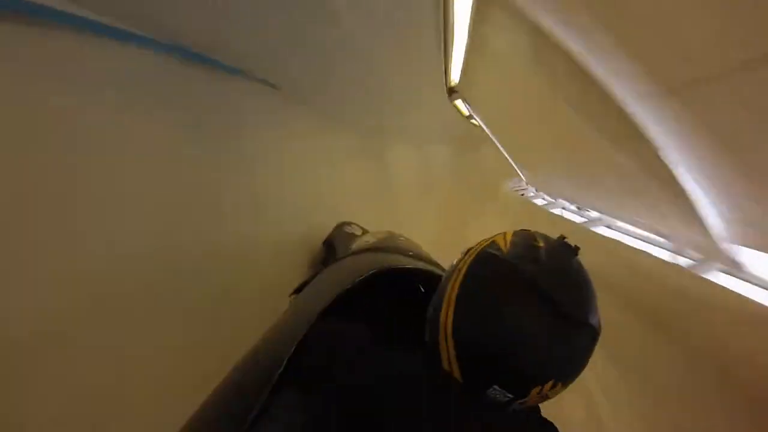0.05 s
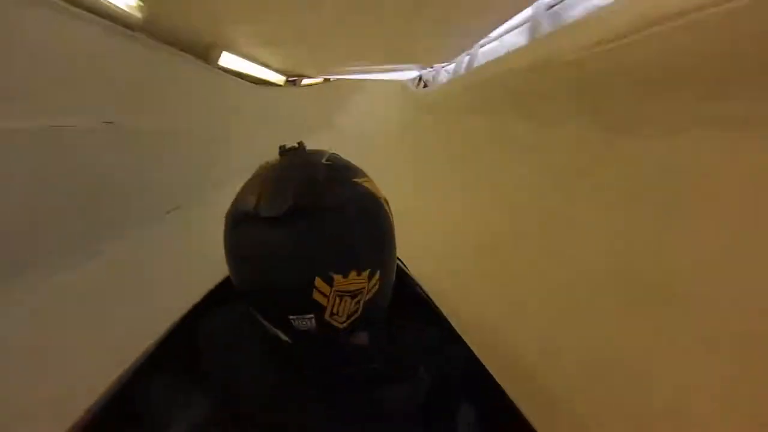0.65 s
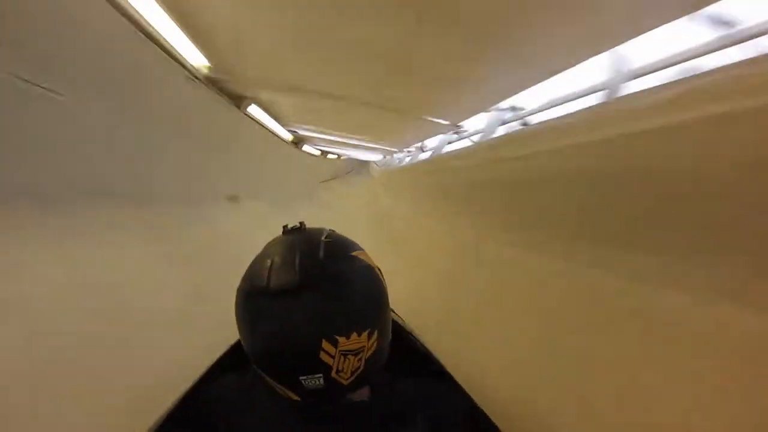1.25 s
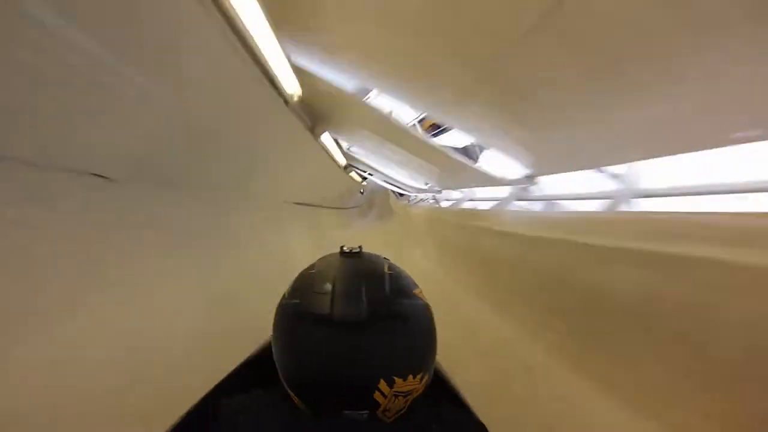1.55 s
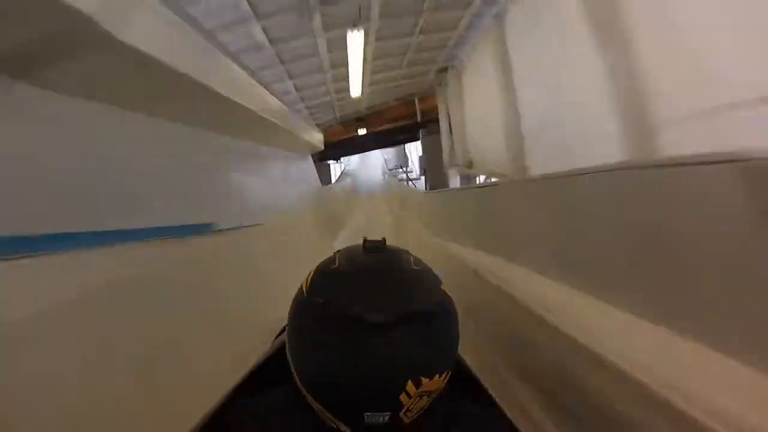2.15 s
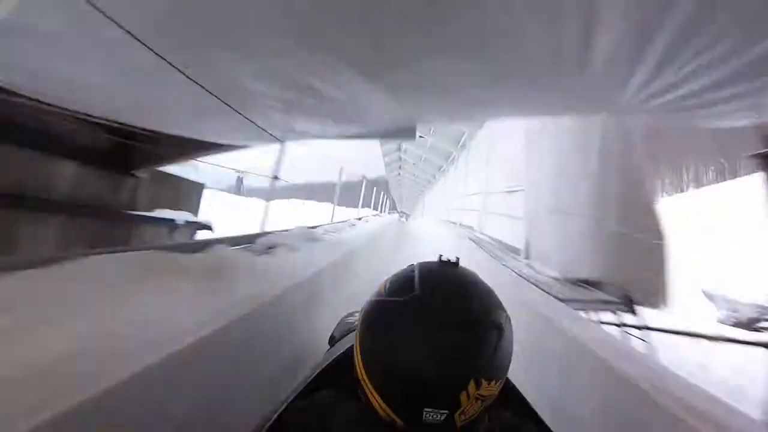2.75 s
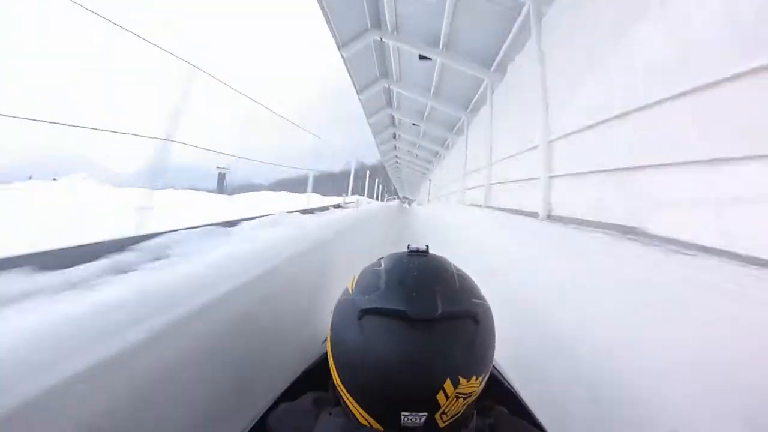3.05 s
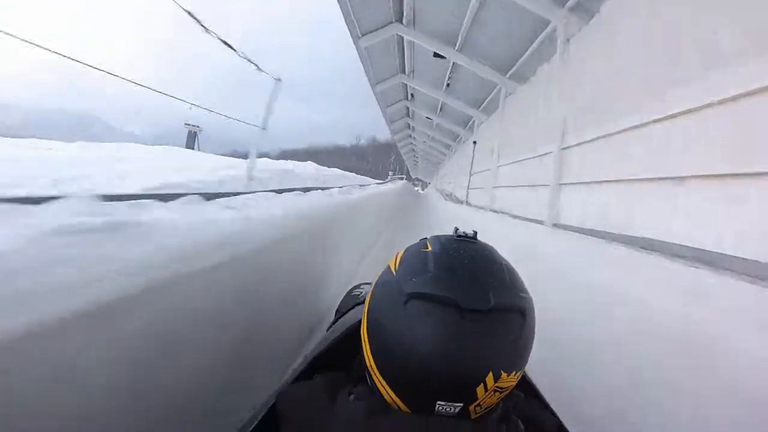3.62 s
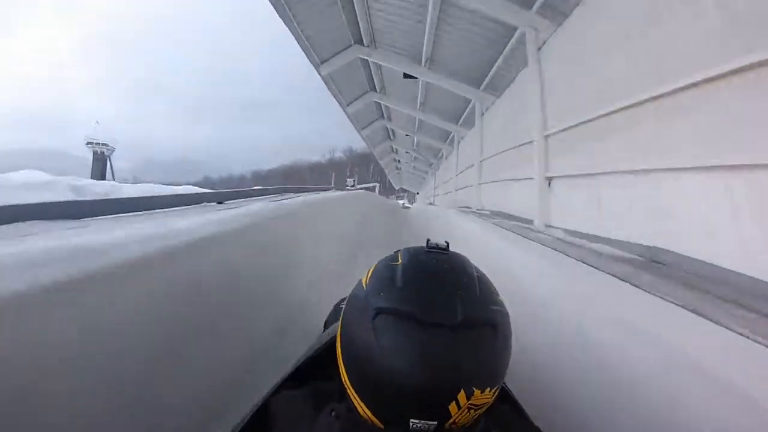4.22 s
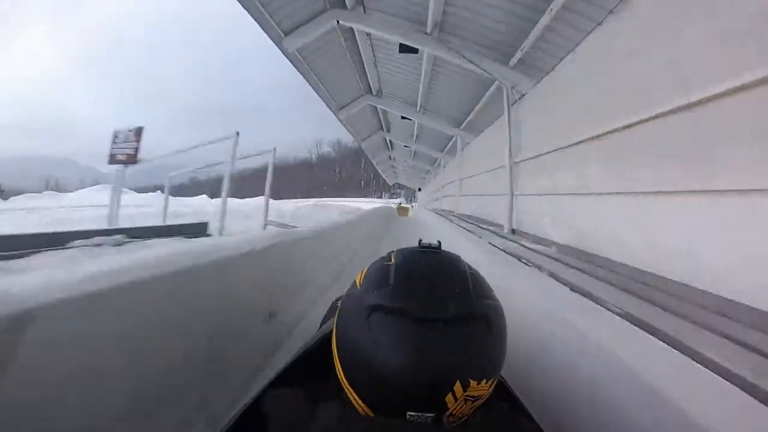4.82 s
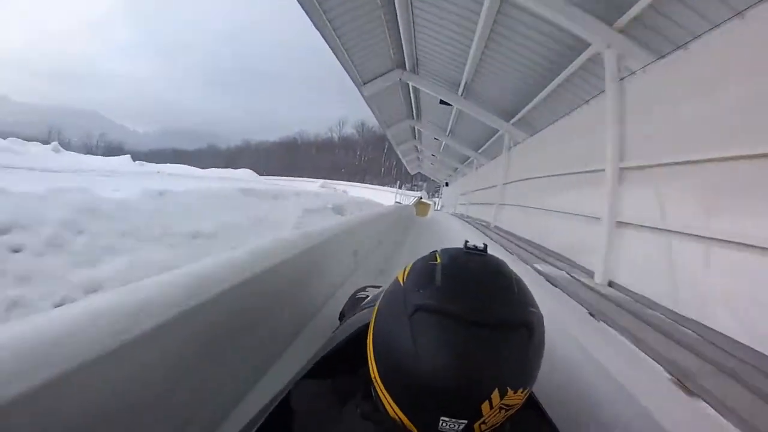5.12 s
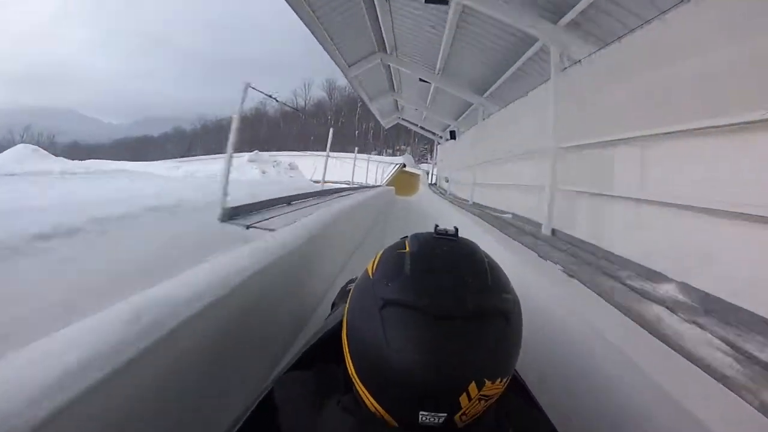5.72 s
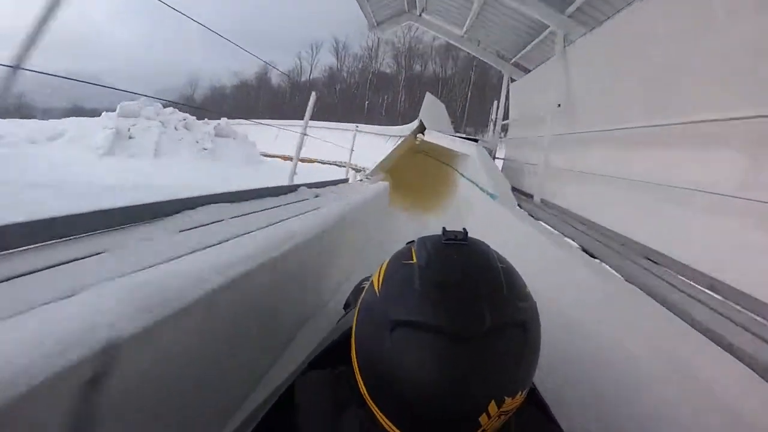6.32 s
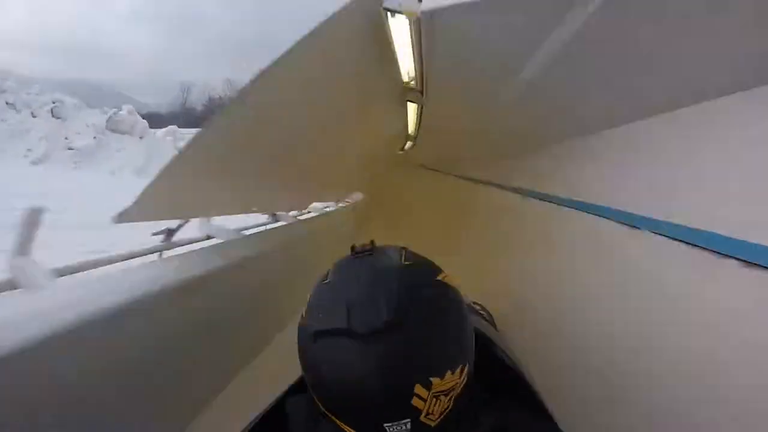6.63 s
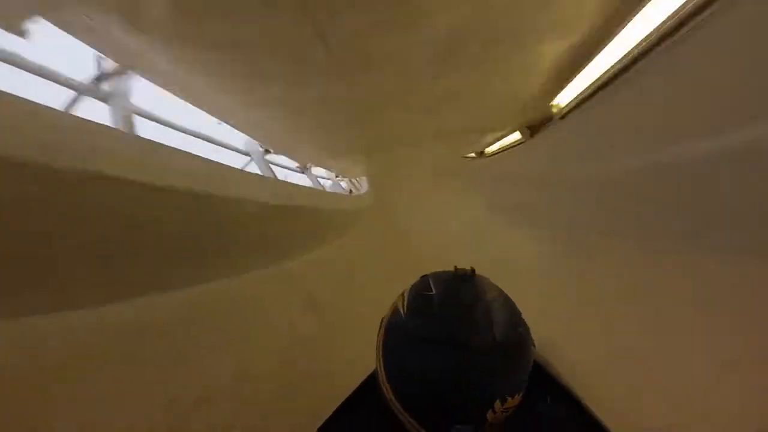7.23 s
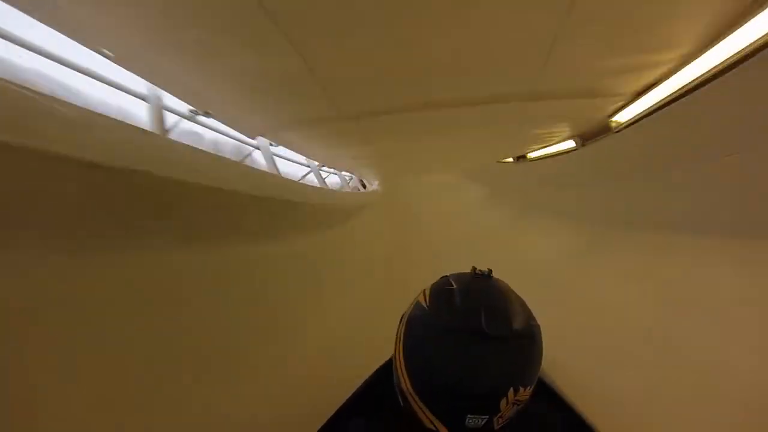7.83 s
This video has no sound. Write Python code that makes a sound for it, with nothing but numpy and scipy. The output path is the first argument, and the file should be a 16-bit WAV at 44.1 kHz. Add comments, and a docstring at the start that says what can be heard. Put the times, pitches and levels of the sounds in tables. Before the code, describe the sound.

A bobsled races along an iced track, heard close from a small camera fixed to the sled. The runners grind and hiss continuously over a roar of air and the throbbing boom of the hollow shell. A heavy thump comes right at the start, then bumps bring harsh scrapes, ice spray and knocking fittings. The ride eases somewhat past the middle and turns rough again briefly near the end.

```python
"""Bobsled on an iced track

Heard at speed from a small cased camera fixed to the sled. Turbulent air roars underneath, louder
where the track is roofed over. Shaking drives the hollow shell to boom, and loose fittings knock.
Sliding friction is the main source: the runners grind over the ice and scrape harder at every bump."""
import sys
import numpy as np
from scipy import signal
from scipy.fft import rfft, irfft
from scipy.io import wavfile

SR = 44100
rng = np.random.default_rng(int(sys.argv[2]) if len(sys.argv) > 2 else 0)


def persist_wave(psi):
    """Save psi, clipped to +-1, as 16-bit WAV."""
    counts = np.round(np.clip(psi, -1, 1) * 32767).astype(np.int16)
    wavfile.write(sys.argv[1], SR, np.atleast_2d(counts).T)


N = 355887
TIME = np.arange(N) / SR


def from_db(db):
    """Amplitude ratio of a level in decibels."""
    return 10 ** (np.asarray(db) / 20)


def rms_one(x):
    """Normalisation to unit power."""
    return x / np.sqrt(np.mean(x ** 2) + 1e-20)


def in_time(rows):
    """Linear interpolation of (time_s, value) at every sample."""
    return np.interp(TIME, *np.transpose(rows))


def swing(db):
    """Deviation of a level from its mean."""
    return db - np.mean(db)


def drift(rate_hz):
    """Slow random modulation: noise low-passed at rate_hz, rms 1."""
    step, settle = 20, 4000
    pole = np.exp(-2 * np.pi * rate_hz * step / SR)
    noise = rng.standard_normal(N // step + settle + 2)
    slow = signal.lfilter([1], [1, -2 * pole, pole * pole], noise)[settle:]
    return np.interp(np.arange(N) / step, np.arange(len(slow)), rms_one(slow))


def burst(start_s, rise_s, decay_s):
    """Impact envelope: linear rise, exponential decay."""
    age = np.maximum(TIME - start_s, 0)
    fall = np.exp(-np.clip((age - rise_s) / decay_s, 0, 20))
    return np.minimum(age / rise_s, 1) * fall


def press(start_s, rise_s, length_s):
    """Contact pressure envelope: linear rise, Gaussian release."""
    age = np.maximum(TIME - start_s, 0)
    release = np.exp(-np.minimum((age / length_s) ** 2, 20))
    return np.minimum(age / rise_s, 1) * release


def ring(start_s, pitch_hz, t60_s):
    """Free vibration of one damped mode."""
    age = np.maximum(TIME - start_s, 0)
    return np.sin(2 * np.pi * pitch_hz * age) * from_db(-60 * np.minimum(age / t60_s, 2))


def jitters(per_s, fall_s, depth):
    """Relaxation: random jolts lift the pressure, which sinks back exponentially; rms 1."""
    jolts = (rng.random(N) < per_s / SR) * rng.uniform(0, 1, N)
    lift = signal.lfilter([1], [1, -np.exp(-1 / (fall_s * SR))], jolts + 1e-18)
    return rms_one(1 + depth * lift)


def crunch(per_s, spread_db, hiss_db):
    """Shot noise: ice grains of uneven size break at random over a smooth friction hiss; rms 1."""
    sizes = from_db(spread_db * np.minimum(rng.exponential(1, N), 4))
    signs = rng.choice([-1, 1], N)
    grains = rms_one(sizes * signs * (rng.random(N) < per_s / SR))
    return rms_one(grains + from_db(hiss_db) * rng.standard_normal(N))


# Resonances of shell and camera case: centre_hz, width_hz, lift_db
CASE_RESONANCES = [(182, 31, 3.5), (388, 72, 6.5), (510, 110, 3.5), (706, 41, 5), (974, 72, 6),
                   (1635, 300, 7), (2400, 130, 3.5), (3023, 500, 5.5), (3390, 350, 2.5), (4135, 340, 3.5),
                   (5446, 540, 7.5), (7440, 1160, 9), (9860, 700, 4.5)]


def through_case(x, spectrum, size=8192):
    """Resonant colouring: shell and case lift peaks on a smooth spectrum, at unit power gain."""
    hz = np.maximum(np.arange(size // 2 + 1) * SR / size, 1)
    points_hz, points_db = np.transpose(spectrum)
    db = np.interp(np.log(hz), np.log(points_hz), points_db)
    for centre_hz, width_hz, lift_db in CASE_RESONANCES:
        db += lift_db / (1 + (2 * (hz - centre_hz) / width_hz) ** 2)
    # Folding the cepstrum gives a causal, minimum-phase response.
    cepstrum = irfft(np.log(from_db(db)))
    cepstrum[1:size // 2] *= 2
    cepstrum[size // 2 + 1:] = 0
    response = irfft(np.exp(rfft(cepstrum)))
    return signal.fftconvolve(x, response / np.linalg.norm(response))[:N]


# Rush of air, loudest under the low roof: time_s, level_db
AIR_LEVEL = [(0, -40.5), (.2, -45.5), (1.1, -42.5), (1.4, -40.5), (1.8, -42.5), (2.05, -41), (2.7, -39.5),
             (3.2, -42.5), (4.75, -44), (5.2, -46), (6.4, -47), (6.9, -43.5), (7.35, -44.5), (8.07, -43)]
# Spectra of the roar and the buffeting: frequency_hz, density_db
ROAR_SPECTRUM = [(60, 6), (140, -5), (185, 3.5), (250, 2.5), (330, -3.5), (600, 0.5), (850, -2.5),
                 (1150, -11), (2000, -18), (6000, -49)]
BUFFET_SPECTRUM = [(12, -3.5), (25, -11), (45, -8.5), (58, 0), (72, -0.5), (90, 6.5), (125, -1), (150, -10),
                   (250, -31.5), (600, -44)]


def air(boom_db):
    """Turbulence: a broad roar, and a deep buffeting that grows with it and with the shaking."""
    roar_db = in_time(AIR_LEVEL)
    roar = from_db(roar_db + 1.4 * drift(22)) * through_case(rng.standard_normal(N), ROAR_SPECTRUM)
    buffet_db = -36.5 + 0.46 * swing(roar_db) + 0.099 * swing(boom_db)
    return roar + from_db(buffet_db) * through_case(rng.standard_normal(N), BUFFET_SPECTRUM)


# Boom of the shell as the track shakes it: time_s, level_db
BOOM_LEVEL = [(0, -30.5), (.4, -36), (.98, -25), (1.3, -31.5), (1.75, -34), (2, -26), (2.2, -33.5),
              (2.4, -25), (3.05, -33.5), (3.5, -28), (4.4, -29), (4.7, -34), (5.2, -30.5), (5.55, -30.5),
              (6.3, -34), (6.9, -35.5), (7.33, -42), (7.5, -30), (8.07, -32.5)]


def shell_boom(boom_db, pitch_hz=107.1, waver_hz=4.02, throb_hz=(3.9, 11.84), depth=0.885):
    """Random forcing: the shell's lowest mode throbs, steadiest in pitch while it swings hard."""
    band = signal.butter(2, throb_hz, "band", fs=SR, output="sos")
    rocking = rms_one(signal.sosfilt(band, rng.standard_normal(N + SR))[SR:])
    throb = 1 + depth * np.tanh(rocking + 0.3)  # the bias makes swells outlast lulls
    wavering_hz = pitch_hz + waver_hz * drift(22.8) / np.sqrt(throb)
    phase = 2 * np.pi * np.cumsum(wavering_hz) / SR
    return from_db(boom_db) * rms_one(throb * np.sin(phase))


# The shell bottoms out once: start_s, pitch_hz, level_db, t60_s
SHELL_BLOW = (0.1165, 108, -9.5, .13)


def thump(rise_s=0.0045):
    """Impulse response: a soft, heavy blow sets the shell swinging for a few cycles."""
    start_s, pitch_hz, level_db, t60_s = SHELL_BLOW
    onset = np.clip((TIME - start_s) / rise_s, 0, 1)
    return from_db(level_db) * ring(start_s, pitch_hz, t60_s) * onset


def rattles(chatter_db, per_s=18, panel_hz=1590, detune=0.034, t60_s=0.031, spots=5):
    """Random impacts: fittings tap a panel, harder on rough ice; each spot has its own pitch."""
    hits = rng.random(N) < per_s / SR
    taps = hits * from_db(chatter_db + 7.5 + 2.5 * rng.uniform(-1.2, 1, N))
    struck_spot = rng.integers(0, spots, N)
    pole = from_db(-60 / (t60_s * SR))
    out = np.zeros(N)
    for spot, pitch_hz in enumerate(panel_hz * (1 + detune * np.linspace(-1, 1, spots))):
        angle = 2 * np.pi * pitch_hz / SR
        feedback = [1, -2 * pole * np.cos(angle), pole * pole]
        out += signal.lfilter([0, np.sin(angle)], feedback, taps * (struck_spot == spot) + 1e-18)
    return out


# Ice chips striking the case: start_s, relative_level_db
CHIP_HITS = [(0.0365, -25), (3.2427, -33), (4.138, -33), (4.474, -25), (4.673, -26), (5.672, -29),
             (6.2348, -27), (6.3905, -22), (6.648, -18)]
# Spectrum of a tick: frequency_hz, density_db
CHIP_SPECTRUM = [(500, -25), (2500, -7), (4300, 2), (7000, -6), (9000, -1), (11500, -2), (16000, 0)]


def chips():
    """Brief contact gives a wide spectrum: flying ice makes tiny bright ticks."""
    hits = sum(from_db(db) * burst(s, rise_s=0.00017, decay_s=0.0008) for s, db in CHIP_HITS)
    return through_case(hits * rng.standard_normal(N), CHIP_SPECTRUM)


# Fittings striking the shell: start_s, pitch_hz, relative_level_db, t60_s
FITTING_HITS = [(0.172, 1590, -16, 0.017), (0.1707, 2300, -13, 0.015), (1.373, 1580, -7.5, 0.055),
                (1.952, 1590, -8, 0.031), (2.105, 1550, -11.5, 0.039), (2.582, 690, -21.5, 0.055),
                (2.803, 1620, -20, .02), (3.309, 960, -25, .028), (3.65, 1620, -15, 0.024),
                (3.847, 1610, -11, 0.035), (3.871, 1630, -17, .021), (3.878, 1640, -12, .026),
                (4.138, 1650, -20, .017), (4.474, 1620, -14, .02), (4.674, 1630, -13, 0.017),
                (5.82, 1760, -19, 0.026), (6.137, 1680, -20, 0.034), (6.434, 4950, -15.5, .011),
                (6.999, 1700, -15, .03), (7.065, 1660, -21, .025), (7.108, 1700, -18.5, .02),
                (7.73, 1670, -22, .05), (7.986, 1590, -16, 0.02)]


def knocks():
    """Impact excitation: each hard contact cracks and leaves a panel mode ringing."""
    rings, cracks = np.zeros(N), np.zeros(N)
    for start_s, pitch_hz, level_db, t60_s in FITTING_HITS:
        rings += from_db(level_db) * ring(start_s, pitch_hz, t60_s)
        cracks += from_db(level_db) * burst(start_s, rise_s=0.00078, decay_s=0.0043)
    return rings + from_db(-17) * through_case(cracks * rng.standard_normal(N), SCRAPE_SPECTRUM)


# A runner edge sings: start_s, length_s, pitch_hz, level_db
EDGE_SQUEALS = [(1.162, .09, 10050, -43), (6.583, .05, 7650, -41)]


def squeals(waver_hz=203):
    """Friction-induced vibration: a thin, unsteady whistle swells and fades."""
    out = np.zeros(N)
    for start_s, length_s, pitch_hz, level_db in EDGE_SQUEALS:
        swell = np.sin(np.pi * np.clip((TIME - start_s) / length_s, 0, 1))
        phase = 2 * np.pi * np.cumsum(pitch_hz + waver_hz * drift(163)) / SR
        out += from_db(level_db) * swell * np.sin(phase)
    return out


# Bumps in the track: start_s, relative_level_db, spray_offset_db, length_s
TRACK_BUMPS = [(0.034, -31, -10, 0.028), (0.203, -29, -20, .025), (0.292, -28, -8.5, 0.072),
               (0.471, -26, -13, 0.037), (0.591, -24, -11.5, 0.046), (0.797, -29, -17, 0.029),
               (0.848, -25, -13, 0.022), (0.887, -25.5, -19, 0.04), (1.301, -22.5, -10.5, 0.021),
               (1.342, -27.5, -18, 0.027), (1.366, -19.5, -15, 0.042), (1.667, -24, -13.5, 0.029),
               (1.943, -22.5, -14.5, 0.047), (2.008, -19, -15, 0.045), (2.098, -20, -13.5, 0.026),
               (2.154, -21, -16, 0.022), (2.36, -31, -8, 0.037), (2.697, -23.5, -17, 0.033),
               (2.751, -23, -9, 0.036), (2.8, -21.5, -11, 0.023), (2.867, -20.5, -16, 0.013),
               (2.908, -20.5, -13, 0.0076), (2.924, -24.5, -9, 0.015), (2.973, -24, -12, 0.022),
               (3.033, -24, -7.5, 0.011), (3.077, -26, -5.5, 0.024), (3.112, -25, -16, 0.014),
               (3.425, -26.5, -27, 0.016), (3.505, -23, -15, 0.015), (3.522, -20.5, -13, 0.021),
               (3.686, -24, -20, 0.007), (3.7, -29.5, -7, .03), (3.869, -23, -9, 0.016),
               (4.135, -22.5, -10, .014), (4.382, -23.5, -11.5, .016), (4.414, -24.5, -8.5, 0.023),
               (4.47, -20.5, -12, 0.022), (4.541, -29, -8, 0.013), (4.613, -33, -14, 0.014),
               (4.676, -28, -13, .03), (4.758, -26, -13, 0.056), (4.82, -26, -12, 0.015),
               (4.993, -30, -20, 0.066), (5.434, -25.5, -12, .011), (5.671, -28.5, -9, 0.037),
               (5.967, -32, -16, 0.1), (6.431, -32.5, -9, 0.038), (6.515, -28.5, -14, 0.037),
               (6.726, -27.5, -12, .024), (6.75, -28.5, -9, 0.031), (6.83, -22, -14.5, 0.025),
               (6.91, -28, -11, 0.013), (6.998, -26, -22, 0.01), (7.058, -24, -16, 0.03),
               (7.111, -22.5, -24, 0.018), (7.173, -30.5, -15, 0.031), (7.717, -30, -15, 0.047),
               (7.985, -27.5, -14, 0.042), (8.04, -24, -16, 0.033)]
# Spectra of hard contact and of thrown ice: frequency_hz, density_db
SCRAPE_SPECTRUM = [(200, -16), (700, -8), (1150, -11.5), (1450, 2.5), (1900, 3.5), (2300, -2.5),
                   (3000, -2.5), (4200, -1), (5500, -14.5), (6500, -22), (9000, -42), (16000, -47)]
THROWN_ICE_SPECTRUM = [(2000, -12), (4500, 2), (6500, 3.5), (9000, 2.5), (11000, 4), (13000, -0.5),
                       (15500, -9)]


def bumps():
    """Transient loading: each bump presses the runners into the ice, scraping and throwing spray."""
    pressure, thrown = np.zeros(N), np.zeros(N)
    for start_s, level_db, spray_db, length_s in TRACK_BUMPS:
        contact = from_db(level_db) * press(start_s, rise_s=0.0022, length_s=length_s)
        pressure = np.hypot(pressure, contact)  # overlapping contacts add in power
        thrown = np.hypot(thrown, contact * from_db(spray_db))
    slips = jitters(per_s=240, fall_s=0.0018, depth=0.8)
    scrape = from_db(1.5) * pressure * slips * crunch(per_s=4000, spread_db=4.5, hiss_db=6.5)
    spray = from_db(0.9) * thrown * slips * crunch(per_s=1700, spread_db=6, hiss_db=7.5)
    return through_case(scrape, SCRAPE_SPECTRUM) + through_case(spray, THROWN_ICE_SPECTRUM)


# Chatter, set by the roughness of the ice: time_s, level_db
CHATTER_LEVEL = [(0, -36), (.75, -37), (.9, -32), (1.07, -38.5), (1.42, -29), (1.85, -35.5), (2.3, -28),
                 (2.55, -34), (3, -29), (3.3, -35), (3.8, -33.5), (4.15, -38.5), (4.45, -32.5),
                 (4.95, -35.5), (5.25, -38), (6, -39), (6.35, -40.5), (6.68, -37.5), (7.05, -31.5),
                 (7.35, -40.5), (8.07, -36.5)]
# Gliding hiss, set by the load, highest in the banked curves: time_s, level_db
GLIDE_LEVEL = [(0, -32), (.25, -33.5), (.6, -30.5), (.9, -29), (1.22, -30.5), (1.42, -26.5), (1.95, -28),
               (2.35, -27.5), (2.5, -29.5), (2.85, -28), (3.2, -33.5), (3.75, -34), (4.15, -31.5),
               (4.9, -32.5), (5.2, -37), (5.9, -33.5), (6.2, -37), (6.68, -36.5), (7.03, -29.5),
               (7.25, -37.5), (7.55, -37.5), (8.07, -35)]
# Spectra of chatter, glide and fine spray: frequency_hz, density_db
CHATTER_SPECTRUM = [(200, -21.5), (700, -28), (1150, -11.5), (1450, -2.5), (1850, 1), (2300, -4.5),
                    (2900, -21), (4200, -23.5), (6000, -22), (16000, -65)]
GLIDE_SPECTRUM = [(500, -18.5), (1300, -13.5), (2000, -9.5), (2450, -1), (2900, 3), (3700, 0.5),
                  (4300, -0.5), (4750, -8.5), (5500, -11.5), (6200, -27.5), (9000, -34.5), (16000, -45)]
SPRAY_SPECTRUM = [(2000, -32), (4500, -2.5), (6500, -1), (9000, -0.5), (11000, -1), (13000, -8),
                  (15500, -16.5)]


def runners(chatter_db):
    """Sliding friction: steel chatters and hisses on the ice, and rougher ice throws more spray."""
    ripple = jitters(per_s=46, fall_s=0.0065, depth=0.83)  # track ripples make the pressure flutter
    spray_db = -43.5 + 0.75 * swing(chatter_db)
    chatter = from_db(chatter_db + 1.58 * drift(21)) * ripple
    chatter *= crunch(per_s=1800, spread_db=2, hiss_db=2)
    glide = from_db(in_time(GLIDE_LEVEL) + 0.68 * drift(25)) * ripple ** 0.94
    glide *= crunch(per_s=3500, spread_db=2, hiss_db=3.5)
    spray = from_db(spray_db + 0.7 * drift(30)) * ripple ** 1.2
    spray *= crunch(per_s=3000, spread_db=-0.5, hiss_db=2)
    return (through_case(chatter, CHATTER_SPECTRUM) + through_case(glide, GLIDE_SPECTRUM)
            + through_case(spray, SPRAY_SPECTRUM))


def scene():
    """Superposition: all sources ride with the listener and add in one channel."""
    boom_db, chatter_db = in_time(BOOM_LEVEL), in_time(CHATTER_LEVEL)
    ice = runners(chatter_db) + bumps() + squeals()
    impacts = from_db(-4) * knocks() + rattles(chatter_db) + from_db(-1) * chips()
    shell = shell_boom(boom_db) + thump()
    return (air(boom_db) + shell + impacts + ice)[None]


def record(dry):
    """Soft saturation rounds the highest peaks; a steep low-pass cuts the top."""
    ceiling, cutoff_hz = 0.6, 15350
    rounded = ceiling * np.tanh(dry / ceiling)
    return signal.sosfilt(signal.ellip(12, 0.1, 90, cutoff_hz, fs=SR, output="sos"), rounded)


dry = scene()
out = record(dry)
persist_wave(out)
```